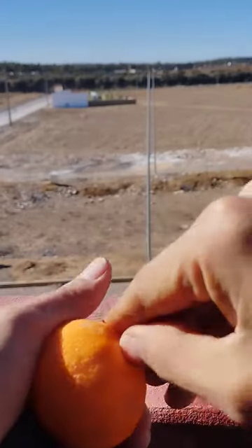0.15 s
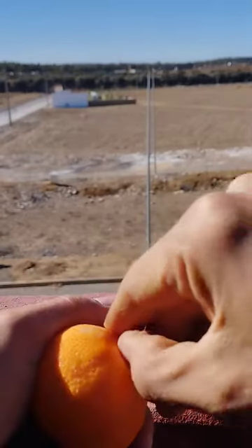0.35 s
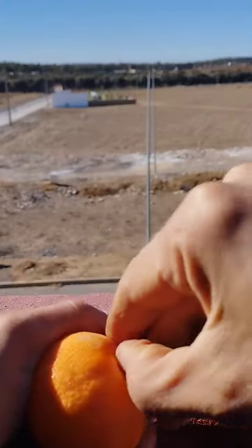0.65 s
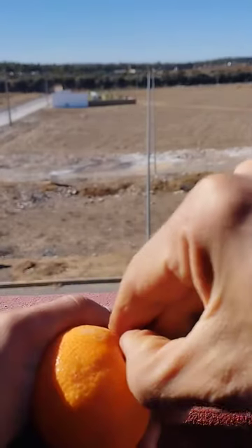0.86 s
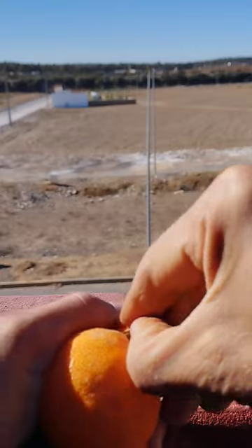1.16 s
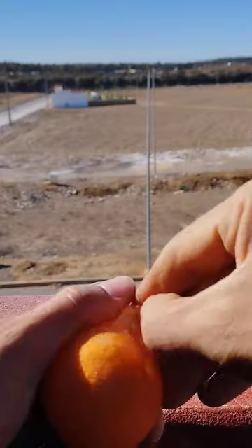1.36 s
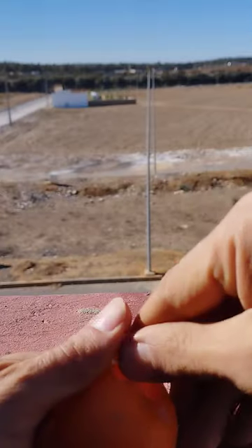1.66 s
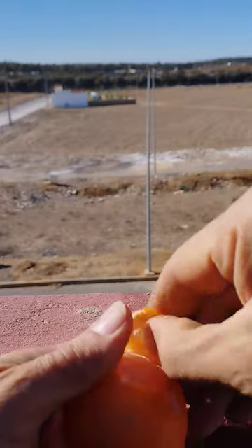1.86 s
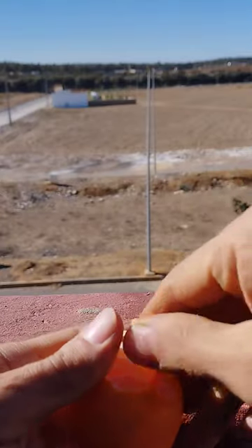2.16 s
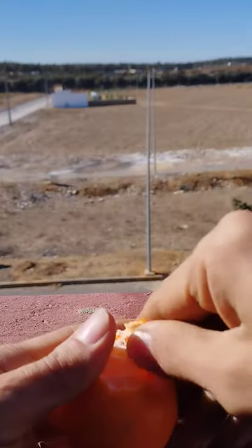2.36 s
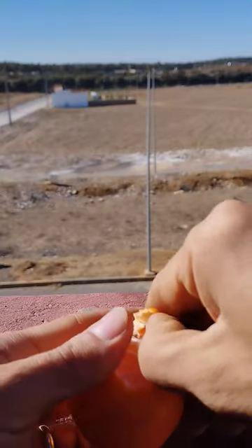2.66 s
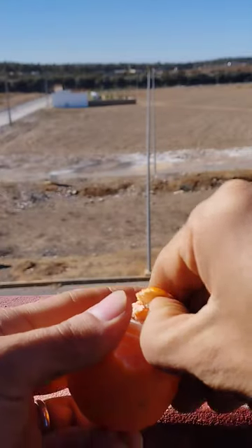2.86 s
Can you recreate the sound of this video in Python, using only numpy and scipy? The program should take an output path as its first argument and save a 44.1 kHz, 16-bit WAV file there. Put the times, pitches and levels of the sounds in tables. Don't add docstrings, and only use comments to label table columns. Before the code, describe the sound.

Fingers peel an orange close to a stereo phone: near quiet first, then brittle snaps and gritty tearing, a second stronger pull, and sparse faint ticks, over steady low open-country rumble and wind.

```python
import sys
import numpy as np
from scipy import signal
from scipy.fft import rfft, irfft
from scipy.io import wavfile
from scipy.ndimage import uniform_filter1d

SR = 44100
rng = np.random.default_rng(int(sys.argv[2]) if len(sys.argv) > 2 else 0)


def gain_from_decibels(decibels):
    exponent = np.asarray(decibels, float) / 20
    return 10 ** exponent


def transcribe(signal):
    frames = np.atleast_2d(signal).T
    limited = np.clip(frames, -1, 1)
    pcm = np.round(limited * 32767).astype(np.int16)
    wavfile.write(sys.argv[1], SR, pcm)


N = 133182

PORT_LAG_S = .00005


def unit(x):
    return x / np.sqrt(np.mean(x ** 2))


def across(table):
    t = np.array(table, float)
    bins_hz = np.arange(N // 2 + 1) * SR / N
    return np.interp(np.log(bins_hz + 1), np.log(t[:, 0] + 1), t[:, 1])


def causal(response):
    cepstrum = irfft(np.log(response), N)
    cepstrum[1:N // 2] *= 2
    cepstrum[N // 2 + 1:] = 0
    return np.exp(rfft(cepstrum))


def colour(x, table):
    below = (table[0][0] / 2, table[0][1] - 40)
    above = (table[-1][0] * 1.025, -70)
    return irfft(rfft(x) * causal(gain_from_decibels(across([below] + list(table) + [above]))), N)


def ring(x, hz, width):
    return signal.lfilter(*signal.iirpeak(hz, hz / width, SR), x)


def curve(table, index):
    t = np.array(table, float)
    return np.interp(np.arange(N) / SR, t[:, 0], t[:, index])


def walk(rate):
    k = int(SR / rate)
    steps = np.repeat(rng.standard_normal(N // k + 1), k)
    return 1.3 * uniform_filter1d(uniform_filter1d(steps, k), k)[:N]


def pair(alike):
    c = np.clip(alike, -.95, .98)
    mid, side = rfft(rng.standard_normal((2, N)))
    mid = mid * np.sqrt((1 + c) / 2)
    side = side * np.sqrt((1 - c) / 2)
    return irfft(np.array([mid + side, mid - side]), N)


def panned(db):
    return gain_from_decibels(np.array([db, -db]) / 2)


def land():
    # frequency in Hz, level in dB per Hz.
    land_colour = [(70, 1.5), (120, -1.5), (230, -6), (400, -11.5), (950, -16), (1600, -24.5), (1850, -30),
                   (3300, -39.5)]
    # frequency in Hz, likeness from -1 to 1.
    land_alike = [(60, 0.68), (130, 1), (290, 0.73), (640, 0.74), (1410, 0.075), (3100, -0.65)]
    # frequency in Hz, left-right difference in dB.
    land_balance = [(60, -6.5), (200, 2.5), (400, 2.5), (1300, 2.5), (3000, 2.5)]
    # frequency in Hz, level in dB per Hz.
    hiss_colour = [(2500, 15), (3200, -13), (5000, -13), (7000, -19), (8300, -11), (10000, -5), (13500, -4),
                   (15500, -5)]
    # time in seconds, low rumble in dB, tyre roar in dB, air hiss in dB.
    traffic = [
        (0, 0, -1, 8),
        (.4, 1, 0, 8),
        (.8, -4, 0.5, -5),
        (1.2, 1, 0, 14),
        (1.6, 1, 1, 3),
        (1.9, 3, 0.5, 3),
        (2.3, -3.5, 0.5, 6),
        (2.7, 1, -1, -4),
        (3.02, 0, -3.5, -6),
    ]
    land_db, hiss_db, roar_from_hz = -52.5, -87.5, 267

    far = colour(pair(across(land_alike)), land_colour)
    far = unit(irfft(rfft(far) * panned(across(land_balance)), N))
    rumble = irfft(rfft(far) * across([(roar_from_hz * 0.97, 1), (roar_from_hz, 0)]), N)
    roar = far - rumble
    far = rumble * gain_from_decibels(curve(traffic, index=1)) + roar * gain_from_decibels(curve(traffic, index=2) + 0.73 * walk(5.09))
    hiss_swell_db = np.clip(curve(traffic, index=3), -2, 2) + 0.42 * walk(11.0)
    hiss = unit(colour(pair(0.), hiss_colour)) * gain_from_decibels(hiss_db + hiss_swell_db)
    return far * gain_from_decibels(land_db) + hiss


def wind():
    # frequency in Hz, level in dB per Hz.
    wind_colour = [(8, 10), (20, 9), (40, 4), (70, -1), (120, -28.5), (250, -30)]
    # time in seconds, level in dB, left-right difference in dB.
    gusts = [
        (0.0, -51.5, -24.5),
        (0.59, -58, 10),
        (0.7, -47.5, -23.5),
        (0.76, -53, -5),
        (1.01, -54, -13),
        (1.34, -48.5, 13),
        (1.61, -53, 3.5),
        (2.76, -56.5, -8),
        (3.02, -60, 13),
    ]
    return unit(colour(pair(0.8), wind_colour)) * gain_from_decibels(curve(gusts, index=1) + 1.0) * panned(curve(gusts, index=2))


def tones():
    tones_hz = [62.2, 97.95, 285.1]
    # time in seconds, then the level of each tone in dB.
    tone_levels = [(0.0, -47.5, -56, -67.5), (0.21, -57, -65, -59), (0.31, -50, -63, -68),
                   (0.4, -52, -49, -61), (0.99, -53, -55.5, -62.5), (1.53, -47, -50, -57.5),
                   (1.59, -105, -45.5, -55), (1.64, -47, -49, -55), (1.94, -62, -60.5, -62),
                   (1.98, -53, -60.5, -58.5), (2.35, -51.5, -52, -56.5), (2.42, -47.5, -54.5, -57),
                   (2.84, -52.5, -62, -58), (2.89, -48.5, -65, -86), (2.96, -42, -57, -59.5),
                   (3.02, -59, -50.5, -62)]
    wander = .008
    flutter_db, flutter_per_s = 3, 22
    beat_db, beat_per_s = 1.2, 11

    right_phase = np.array([[0], [.15]])
    out = 0
    for k, hz in enumerate(tones_hz):
        turns = np.cumsum(hz * (1 + wander * walk(12))) / SR
        wave = np.sqrt(2) * np.sin(2 * np.pi * turns + right_phase)
        flutter = flutter_db * walk(flutter_per_s) + beat_db * walk(beat_per_s)
        out = out + wave * gain_from_decibels(curve(tone_levels, index=k + 1) - 1.12 + flutter)
    return out


def drone(lines):
    return sum(unit(ring(pair(0.93), hz, width)) * gain_from_decibels(db) for hz, width, db in lines)


def machinery():
    # frequency in Hz, width in Hz, level in dB.
    hum_lines = [(143.7, 3.3, -59), (169.04, 6.2, -60.5), (204.2, 4.7, -64), (250, 4.5, -69),
                 (323.6, 2.1, -68.5), (375.3, 4.6, -85)]
    # time in seconds, swell in dB.
    hum_swell = [
        (0, 2),
        (.6, 1),
        (1.1, 0),
        (1.35, 4.5),
        (1.6, 1.5),
        (2, 0.5),
        (2.4, -1),
        (3.02, -2),
    ]
    return drone(hum_lines) * gain_from_decibels(curve(hum_swell, index=1))


def vehicle():
    # frequency in Hz, width in Hz, level in dB.
    vehicle_lines = [(581, 18, -62), (665, 28, -68.5), (511, 30, -67)]
    arrives_s, rise_s = 2.21, 0.55
    tyres_hz, tyres_width_hz, tyres_db = 2380, 660, -81.5
    tyres_s, tyres_last_s = 2.48, .25

    t = np.arange(N) / SR
    swell = .5 + .5 * np.tanh(2 * (t - arrives_s) / rise_s)
    hiss = ring(ring(pair(.1), tyres_hz, tyres_width_hz), tyres_hz, tyres_width_hz)
    hiss = unit(hiss) * gain_from_decibels(tyres_db) * np.exp(-((t - tyres_s) / tyres_last_s) ** 2)
    return drone(vehicle_lines) * swell + hiss


def rub():
    # middle in seconds, half length in seconds, pitch in Hz, level in dB.
    squeaks = [
        (1.19, .02, 3600, -84),
        (2.244, .008, 2700, -77),
        (2.288, .003, 4500, -83),
    ]
    start_s, rise_s, level_db, grit_db = 2.81, 0.27, -78.5, 3
    rub_hz, width_hz = 6300, 1300

    t = np.arange(N) / SR
    grow = np.sqrt(np.clip((t - start_s) / rise_s, 0, 1))
    hiss = unit(ring(ring(pair(0.17), rub_hz, width_hz), rub_hz, width_hz))
    out = hiss * grow * gain_from_decibels(level_db + grit_db * walk(120))
    for s, half, hz, db in squeaks:
        out = out + np.sin(2 * np.pi * hz * t) * np.exp(-((t - s) / half) ** 4) * gain_from_decibels(db + 4 * walk(400))
    return out


def tear():
    # time in seconds, level in dB, brightness in dB.
    pulls = [
        [(0, -80.5, -2), (.1, -83, -2), (.18, -77.5, 2.5), (.25, -90.5, -2.5), (1.14, -88.5, -3),
         (1.77, -84.5, -8), (1.96, -77, -5.5), (2.26, -80, -5), (2.45, -90.5, -3)],
        [(1.17, -100, 1), (1.22, -81, 0), (1.3, -75.5, -2), (1.36, -78.5, -5), (1.42, -77, -8),
         (1.47, -74, -17), (1.55, -71.5, -4), (1.6, -80, -5), (1.63, -100, 11)],
        [(1.68, -100, -5), (1.71, -80, -8), (1.73, -75, -11), (1.76, -100, -13)],
        [(1.965, -100, -6), (1.985, -66, -7), (2.03, -72, -12), (2.07, -70, -5), (2.1, -65.5, -5),
         (2.14, -67.5, -6), (2.18, -73.5, -6), (2.205, -76, -3), (2.23, -100, -19)],
    ]
    # frequency in Hz, level in dB per Hz.
    body_colour = [(1800, 1.5), (2800, -7.5), (3400, 0), (4200, -1), (5500, -1.5), (7000, -4), (7800, -8.5)]
    # frequency in Hz, level in dB per Hz.
    air_colour = [(7600, -31), (8600, -6), (10000, -3), (11500, -10), (13500, 3.5), (15400, 0.5)]
    clicks_per_s, spread_db, top_db = 2500, 4, 14
    shared = .2
    fits_db, fits_per_s = 2.2, 260
    flap_hz, flap_width_hz, flap_db = 3480, 130, -7

    chance = rng.random((2, 2, N))
    size = gain_from_decibels(np.minimum(spread_db * rng.exponential(size=(2, N)), top_db))
    clicks = (chance[0] < clicks_per_s / SR) * np.sign(chance[1] - .5) * size
    left = clicks[0]
    right = shared * np.roll(left, int(PORT_LAG_S * SR)) + np.sqrt(1 - shared ** 2) * clicks[1]
    both = np.array([left, right])

    body = unit(colour(both, body_colour)) * panned(-2.0)[:, None]
    air = unit(colour(both, air_colour)) * panned(1.6)[:, None]
    body = body + ring(body, flap_hz, flap_width_hz) * gain_from_decibels(flap_db)
    out = 0
    for pull in pulls:
        out = out + (body + air * gain_from_decibels(curve(pull, index=2))) * gain_from_decibels(curve(pull, index=1))
    return out * gain_from_decibels(fits_db * walk(fits_per_s))


def burst(age, hz, cycles):
    u = np.maximum(age, 0) * hz
    return np.sin(2 * np.pi * u) * u / cycles * np.exp(1 - u / cycles * 2) * 2


def cracks():
    # start in seconds, peak in dB,
    # pitch in Hz, brightness in dB.
    cracks_and_ticks = [(0.6035, -62.5, 3660, 18), (1.015, -53, 4740, 15.5), (1.2275, -43.5, 4800, 5),
                        (1.2305, -54, 4000, 11), (1.2801, -40.5, 4100, 6), (1.3342, -43.5, 4200, 10),
                        (1.3375, -55, 5000, 14), (1.34, -54, 3610, 8), (1.4043, -45, 4650, 14),
                        (1.4367, -51, 4470, 12), (1.4474, -32.5, 4800, 10.5), (1.468, -44, 4560, -10),
                        (1.501, -57, 4470, 18), (1.5062, -29.5, 4200, -5), (1.511, -50, 4130, 16),
                        (1.54, -50, 3570, 1), (1.5572, -42, 4530, 6), (1.9821, -39.5, 4660, -11),
                        (1.9875, -60, 3720, -2), (2.002, -50, 5900, -2), (2.0339, -32, 5460, 2),
                        (2.091, -48, 5330, 12), (2.0962, -47, 3700, 15), (2.1004, -42.5, 4520, 9),
                        (2.134, -43.5, 5400, 10), (2.1618, -40.5, 6600, -2), (2.175, -40, 6950, 0),
                        (2.199, -46, 5830, 6), (2.202, -35.5, 5900, 9.5), (2.5515, -54, 4150, -10),
                        (2.7153, -48.5, 5260, -21),
                        (.545, -55.5, 5000, 7), (1.114, -66, 4500, 11), (1.222, -58, 5030, 6),
                  (1.328, -51, 4200, 0), (1.397, -59, 5000, 8), (1.4695, -47, 4970, -8),
                  (1.5444, -53, 3300, 0), (1.548, -46, 5200, 3), (1.592, -63, 4200, -5),
                  (1.725, -63, 4540, -6), (2.019, -50, 3200, -8), (2.046, -49, 5500, -4),
                  (2.052, -52, 6000, 0), (2.078, -55, 6000, 0), (2.0935, -40, 6350, 4),
                  (2.115, -43, 6200, -4), (2.131, -53, 5200, -4), (2.139, -51, 5800, 6),
                  (2.147, -56, 6200, -4), (2.188, -49, 6300, 0), (2.557, -56, 6200, -10),
                  (2.596, -60.5, 5200, -12), (2.828, -73, 6200, -12), (2.875, -58, 6600, -16),
                  (2.9028, -60, 6200, -12), (2.9842, -58, 6800, -10)]
    crack_db, crack_cycles = -4.5, 1.19
    snap_hz, snap_cycles, snap_delay_s = 12200, 1.08, .0005
    echo_s, echo_db = .0014, (-22, -14)
    tail_s, tail_db, tail_wide = .0028, -9, .7
    fizz_s, fizz_db = 0.003, -19
    right_pitch = 1.11
    right_shade_db = -12

    events = cracks_and_ticks
    size = 2048
    out = np.zeros((2, N + size))
    grit = rng.standard_normal((len(events), 2, size))
    age = np.arange(size) / SR
    gains = panned(-1.5)
    for (s, db, hz, bright_db), noise in zip(events, grit):
        first = int(s * SR)
        for side in range(2):
            def hit(late):
                rind = burst(age - late, hz * right_pitch ** side, crack_cycles)
                snap = burst(age - late, snap_hz, snap_cycles)
                return rind + gain_from_decibels(bright_db + side * right_shade_db) * snap

            late = s - first / SR + side * PORT_LAG_S + snap_delay_s
            tail = ring(noise[side], hz, hz * tail_wide) * np.exp(-age / tail_s) * gain_from_decibels(tail_db)
            fizz = np.diff(noise[side], prepend=0) * np.exp(-age / fizz_s) * gain_from_decibels(fizz_db)
            echo = gain_from_decibels(echo_db[side]) * hit(late + echo_s)
            sound = hit(late) + echo + (tail + fizz) * (age > late)
            out[side, first:first + size] += sound * gain_from_decibels(db + crack_db) * gains[side]
    return out[:, :N]


def shell(snaps):
    snaps = signal.sosfilt(signal.butter(3, 2350, "high", fs=SR, output="sos"), snaps)
    snaps = snaps - 0.81 * ring(snaps, 8200, 740)
    return signal.sosfilt(signal.butter(10, 15400, fs=SR, output="sos"), snaps)


def scene():
    rest = land() + wind() + tones() + machinery() + vehicle() + rub() + tear()
    rest = signal.sosfilt(signal.ellip(8, .2, 50, 15600, fs=SR, output="sos"), rest)
    return shell(cracks()) + rest


def roll_off(x):
    return signal.sosfilt(signal.butter(12, 16500, fs=SR, output="sos"), x)


def record(dry):
    return roll_off(dry)


dry = scene()
out = record(dry)
transcribe(out)
```